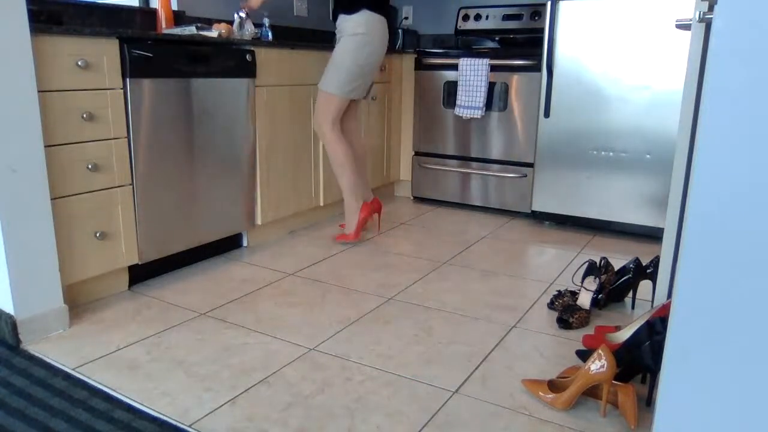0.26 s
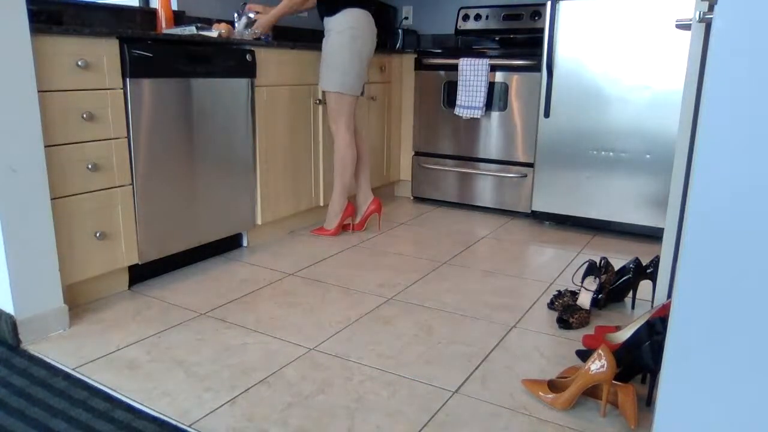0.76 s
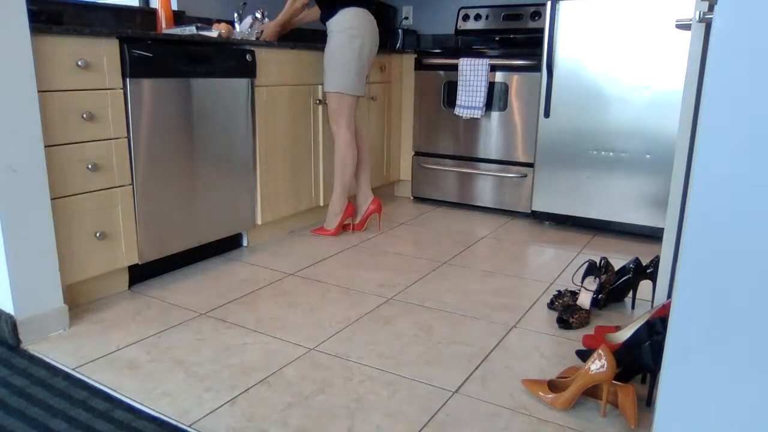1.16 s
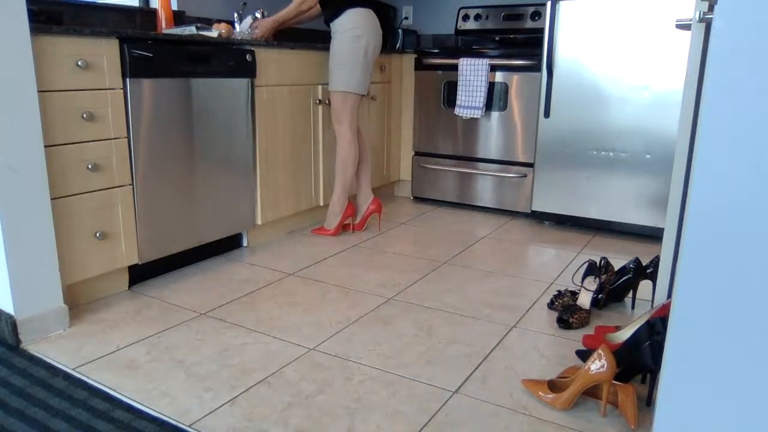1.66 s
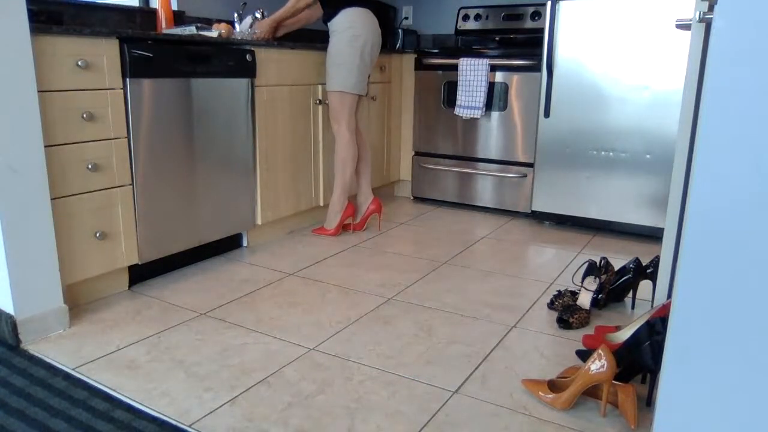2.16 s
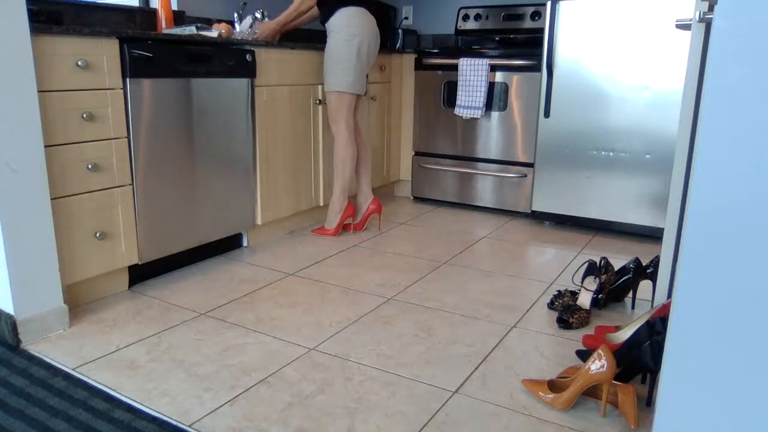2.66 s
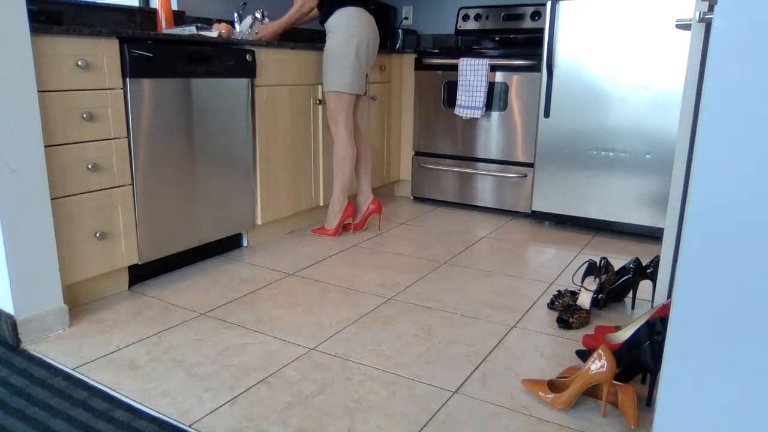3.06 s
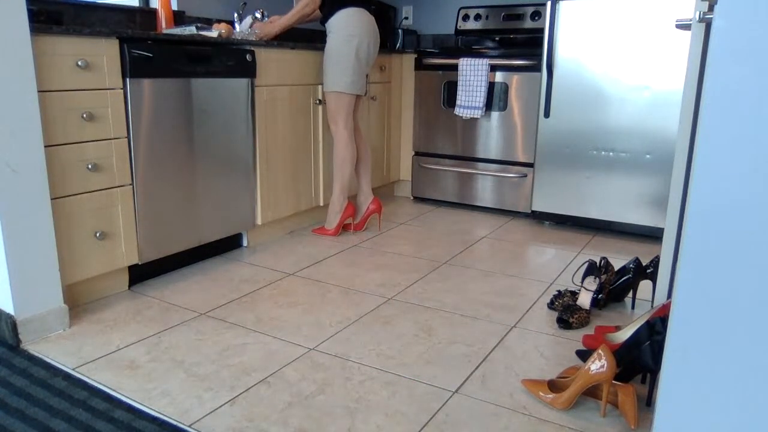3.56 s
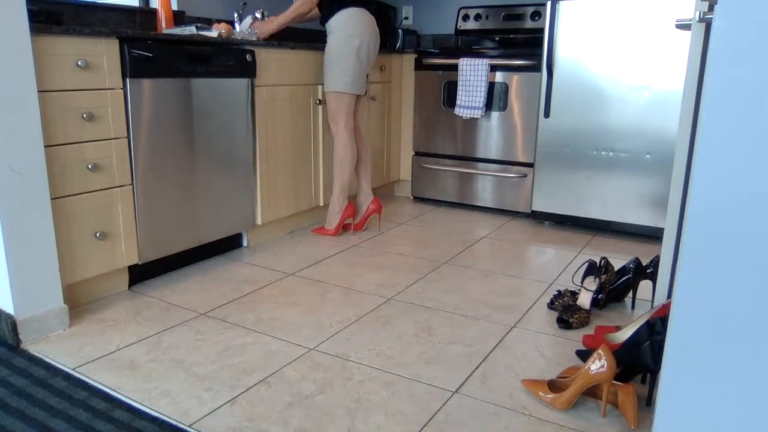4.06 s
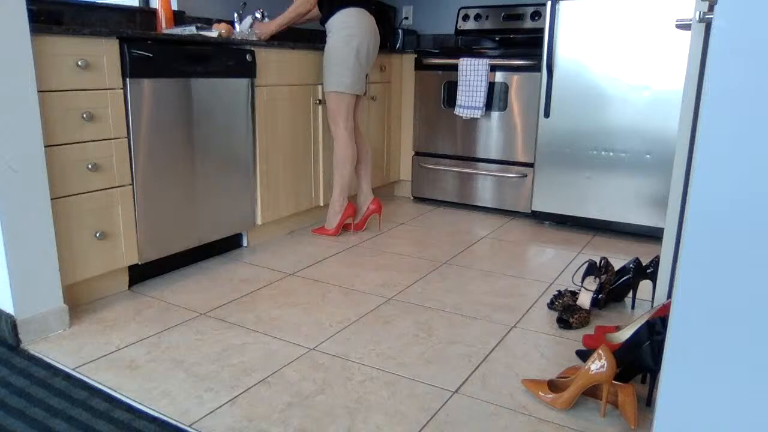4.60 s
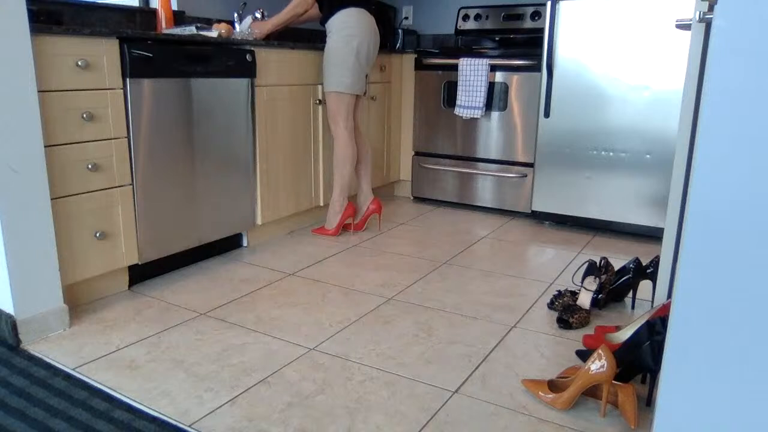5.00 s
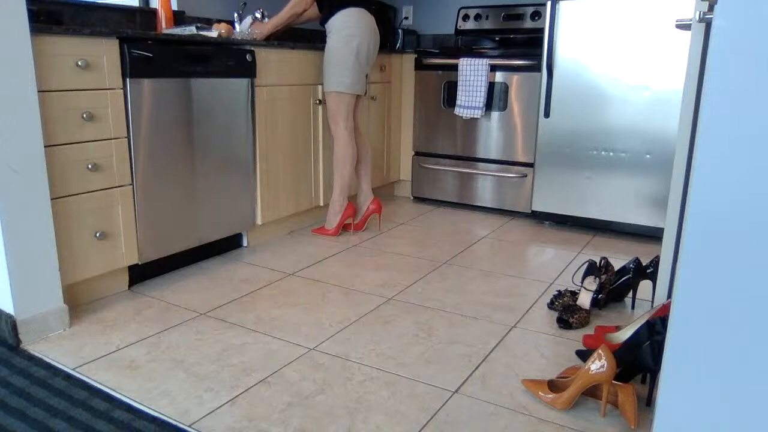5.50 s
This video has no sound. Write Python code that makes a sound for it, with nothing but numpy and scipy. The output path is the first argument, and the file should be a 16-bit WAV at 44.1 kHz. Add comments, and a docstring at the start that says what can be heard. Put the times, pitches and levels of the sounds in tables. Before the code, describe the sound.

High heels knock on a tile floor, then tap water splashes in short, uneven bursts over hands in a steel kitchen sink.

```python
"""A heel knocks, the room booms, and water splashes in short bursts: hands work under a tap that
runs into a steel kitchen sink across the room. Splashes are ringing bubbles, each burst with its
echo off the tiles; lower rings follow one heel knock and plop in the basin. The smallest drops
make a bright spray, dense ones a brief hiss. The bursts stop short. Between them the stream drums,
gurgles and hisses, faint and patchy. A noise suppressor dims the lulls."""
import sys
import numpy as np
from scipy import signal
from scipy.fft import rfft, irfft, next_fast_len
from scipy.io import wavfile
from scipy.ndimage import uniform_filter1d

SR = 44100
rng = np.random.default_rng(int(sys.argv[2]) if len(sys.argv) > 2 else 0)


def generate_wav(signal):
    """Clip the signal to [-1, 1] and save it as 16-bit WAV at the path in sys.argv[1]."""
    frames = np.transpose(np.atleast_2d(signal))
    scaled = np.clip(frames, -1, 1) * 32767
    pcm = np.round(scaled).astype(np.int16)
    wavfile.write(sys.argv[1], SR, pcm)


N = 253134
T = np.arange(SR // 3) / SR  # time within one event, s


def amp(db):
    return 10 ** (np.asarray(db) / 20)


def unit_rms(x):
    return x / np.sqrt(np.mean(x ** 2) + 1e-20)


def curve(points, hz):
    """Linear gain from (f/Hz, level/dB) points on a log frequency axis."""
    f, db = np.transpose(points)
    return amp(np.interp(np.log(hz + 1), np.log(f + 1), db))


def bell(hz, centre_hz, octaves):
    return np.exp(-.5 * (np.log2((hz + 1) / centre_hz) / np.clip(octaves, .015, 1.5)) ** 2)


def filtered(x, response):
    size = next_fast_len(len(x) + 4096)
    return irfft(rfft(x, size) * response(np.fft.rfftfreq(size, 1 / SR)), size)[:len(x)]


def envelope(t, t60_s, length_s, rise_s, fall_db_per_s=400):
    """Rise and decay, with an extra fall after length_s."""
    fall_db = fall_db_per_s * np.clip(t - length_s, 0, None)
    return (1 - np.exp(-t / rise_s)) * amp(-60 * t / t60_s - fall_db)


def add(track, start_s, sound):
    track[round(start_s * SR):][:len(sound)] += sound


def droplets(size, per_s, cycles, drops_db):
    """Noise strewn with tiny ringing drops, each drawn out by the tiled walls."""
    when, pitch, rank = rng.random((3, size * per_s // SR + 1, 1))
    steps = np.arange(SR // 60)
    age_cycles = steps / SR * 1800 * 9 ** pitch
    shape = (1 - np.exp(-(age_cycles / 3) ** 2)) * np.exp(-age_cycles / cycles)
    strength = amp(3.5 * np.log(1 / rank).clip(0, 3.5)) * 3 ** pitch
    rings = strength * shape * np.sin(2 * np.pi * age_cycles)
    drops = np.bincount(((when * size).astype(int) + steps).ravel(), rings.ravel())[:size]
    walls = rng.standard_normal(SR // 8) * amp(-60 * T[:SR // 8] / .11)
    blurred = signal.fftconvolve(drops, walls)[:size]
    return rng.standard_normal(size) + amp(drops_db) * unit_rms(blurred)


def ringing_bursts(bursts, count, cycles, glide, t60_lengths, echo_db, skirt_db):
    """Each burst is a slap, a few short rising rings, and the room's echo of their pitches."""
    out = np.zeros(N + SR)
    for start_s, db, hz, length_s, octaves in bursts:
        when, weakness = rng.random((2, count, 1))
        when[0] = 0  # one ring opens the burst
        pitch_hz = hz * 2 ** (octaves * rng.standard_normal((count, 1)))
        strength = amp(-9 * weakness)
        age_cycles = np.clip(T[:SR // 8] - length_s * when ** 2, 0, None) * pitch_hz
        shape = (1 - np.exp(-(age_cycles / 2) ** 2)) * np.exp(-age_cycles / cycles)
        phase = 2 * np.pi * age_cycles * (1 + glide * age_cycles)
        chirps = strength * amp(-6.9 * when) * shape * np.sin(phase)
        colour = lambda f: ((strength * bell(f, pitch_hz, 0.066)).sum(axis=0)
                            + 1.8 * bell(f, hz, octaves) + amp(skirt_db) * bell(f, hz, 5.6 * octaves))
        spatter = unit_rms(filtered(droplets(len(T), per_s=600, cycles=7, drops_db=-3), colour))
        slap = spatter * envelope(T, 0.0069, length_s, rise_s=0.0007)
        swell_s = 0.014 * np.exp(-0.07 * db) * length_s  # weak bursts swell more slowly
        echo = spatter * envelope(T, t60_lengths * length_s, length_s, swell_s)
        add(out, start_s, amp(1.99 * db + 11) * slap)  # only strong bursts slap hard
        add(out, start_s, amp(db - 6) * chirps.sum(axis=0))
        add(out, start_s, amp(db + echo_db) * echo)
    return out[:N]


# Small-bubble bursts: t/s, level/dB, f/Hz, length/s, spread/oct
SPLASH_BURSTS = [(.962, -32.5, 5100, 0.068, 0.21), (.9974, -43, 5470, 0.25, 0.18),
                 (1.1157, -27.5, 4860, 0.06, .27), (1.3127, -24, 4850, 0.078, .13),
                 (1.356, -32, 5100, 0.034, .2), (1.438, -33.5, 5400, .07, 0.34),
                 (1.516, -35, 5900, 0.044, 0.099), (1.6204, -30, 5730, 0.066, 0.059),
                 (1.689, -26, 4000, 0.15, .25), (1.7255, -22.5, 5000, 0.053, 0.27),
                 (1.809, -20, 5000, 0.13, 0.39), (1.877, -17, 5790, 0.035, 0.37),
                 (2.0165, -28.5, 5880, 0.045, .15), (2.0394, -30.5, 4340, .055, .12),
                 (2.0926, -32.5, 3570, .11, 0.25), (2.18, -29.5, 6630, 0.047, 0.23),
                 (2.2534, -26, 6550, 0.013, .16), (2.305, -26, 4760, .02, 0.31),
                 (2.3233, -13, 4110, 0.078, .18), (2.4129, -13, 4560, 0.08, 0.32),
                 (2.4705, -14.5, 6000, 0.045, .13), (2.528, -24.5, 5720, 0.078, 0.091),
                 (2.585, -20, 4800, 0.057, .22), (2.659, -30, 5740, 0.034, .17),
                 (2.7362, -21.5, 3500, 0.083, .24), (2.889, -33, 4240, 0.055, 0.15),
                 (3.019, -24, 4680, 0.062, .4), (3.071, -15, 5380, 0.043, .23),
                 (3.107, -29.5, 4460, 0.081, .1), (3.1683, -21, 6190, 0.05, 0.1),
                 (3.24, -27.5, 5030, 0.019, .08), (3.361, -25.5, 6660, 0.069, 0.18),
                 (3.388, -20, 5580, .06, 0.21), (3.514, -23.5, 5020, 0.042, 0.35),
                 (3.581, -25.5, 4690, 0.077, .13), (3.668, -28, 4560, 0.07, 0.27),
                 (4.2, -33.5, 4740, 0.12, 0.57), (4.302, -29.5, 5300, 0.039, 0.24),
                 (4.3505, -26.5, 5730, 0.11, 0.16), (4.416, -39, 5900, 0.031, 0.099),
                 (4.6144, -42, 5800, 0.036, 0.23), (4.775, -25.5, 5080, .06, 0.23),
                 (4.8326, -22.5, 4630, 0.059, 0.13), (5.015, -31, 3670, 0.077, 0.14),
                 (5.0446, -25.5, 6600, 0.063, .15), (5.1722, -25.5, 4700, 0.073, 0.066),
                 (5.23, -22.5, 3910, 0.053, 0.078), (5.321, -32.5, 4330, 0.058, 0.086),
                 (5.3796, -35, 4100, 0.045, .12), (5.464, -25, 5420, 0.11, .25)]


def splashes():
    """Hands break the stream into bubbles: a narrow spread of sizes plinks, a wide one splats."""
    return ringing_bursts(SPLASH_BURSTS, count=12, cycles=9.8, glide=0.0016,
                          t60_lengths=5.02, echo_db=-12.5, skirt_db=-10)


# Short low-pitched rings: t/s, level/dB, f/Hz, length/s, spread/oct
LOW_RINGS = [(.549, -34.5, 1050, 0.029, .08), (.562, -36.5, 665, 0.052, 0.052), (.79, -56, 1820, .1, 0.047),
             (1.629, -48, 752, 0.048, 0.039), (1.734, -42.5, 759, 0.076, .3), (1.855, -50, 697, 0.039, .1),
             (1.955, -41, 1980, 0.064, 0.148), (2.102, -46.5, 2360, 0.1, 0.16),
             (2.322, -43, 1520, 0.14, 0.195), (2.41, -38.5, 1633, 0.067, 0.14),
             (2.593, -28.5, 2007, 0.069, 0.076), (3.163, -39.5, 1225, 0.049, 0.097),
             (3.208, -45.5, 2340, 0.054, 0.066), (3.673, -41.5, 2570, 0.061, 0.09),
             (3.748, -44.5, 2390, 0.098, 0.37), (4.6, -55, 2420, 0.1, .08), (4.61, -57, 642, .08, 0.092),
             (5.085, -52, 1112, .08, 0.37), (5.56, -43.5, 2340, 0.09, 0.19), (5.634, -50, 875, 0.05, .4)]


def low_rings():
    """The first two ring on after a heel knock; the rest are plops in the basin."""
    return ringing_bursts(LOW_RINGS, count=5, cycles=24, glide=0.00062,
                          t60_lengths=4.08, echo_db=2, skirt_db=1)


# Hiss spectrum: f/Hz, level/dB
HISS_SPECTRUM = [(4120, -25.5), (7000, -8), (7870, -11), (9190, -4.5), (15100, -6), (16000, -18.5),
                 (16300, -78)]
# Fine spray: t/s, level/dB, emphasis f/Hz, length/s
SPRAY_BURSTS = [(0.358, -28, 11200, 0.11), (0.5567, -23, 9300, .17), (0.971, -35.5, 10800, 0.097),
                (0.988, -29.5, 9550, 0.053), (1.104, -46, 9600, 0.1), (1.206, -40, 11700, 0.066),
                (1.276, -35, 9300, .06), (1.3684, -31.5, 10800, 0.11), (1.5, -33.5, 10700, .06),
                (1.565, -34, 10600, .045), (1.621, -36.5, 11300, 0.03), (1.701, -27, 8100, 0.019),
                (1.796, -36, 8900, 0.066), (1.934, -54, 10100, 0.046), (1.999, -32.5, 11100, 0.068),
                (2.077, -43, 14200, 0.1), (2.183, -34, 8900, 0.056), (2.256, -30.5, 11300, 0.044),
                (2.32, -21.5, 12700, 0.041), (2.406, -20.5, 8800, 0.069), (2.46, -20, 9400, .06),
                (2.624, -57, 8700, 0.019), (2.688, -62, 11400, 0.047), (2.7413, -21, 11700, 0.032),
                (2.797, -40, 13500, 0.024), (2.8802, -24.5, 10450, 0.049), (3.01, -34.5, 13700, .057),
                (3.159, -24, 10500, 0.027), (3.23, -33.5, 13100, 0.03), (3.35, -51, 12400, .065),
                (3.378, -32, 11100, 0.049), (3.5, -43, 9650, 0.048), (3.663, -25, 11300, 0.043),
                (3.726, -36.5, 11200, 0.051), (3.954, -44.5, 9600, 0.027), (4.087, -38, 11500, 0.029),
                (4.2, -40, 13900, 0.049), (4.598, -40, 15000, 0.043), (4.698, -35.5, 10600, 0.026),
                (4.778, -41, 11700, 0.04), (4.8262, -24.5, 12000, 0.04), (5.036, -33, 9600, 0.045),
                (5.105, -36.5, 9100, 0.026), (5.172, -31.5, 13500, 0.053), (5.378, -35.5, 13500, .025),
                (5.489, -28, 9100, .03), (5.508, -27.5, 9800, .13), (5.638, -33, 13400, 0.027)]


def spray():
    """The smallest drops: a bright, grainy hiss that stops short."""
    out = np.zeros(N + SR)
    t = T[:SR // 4]
    for start_s, db, hz, length_s in SPRAY_BURSTS:
        # single drops sink into the hiss of a long burst
        drops = droplets(len(t), per_s=300, cycles=8, drops_db=6 - 100 * length_s)
        hiss = filtered(drops, lambda f: curve(HISS_SPECTRUM, f) * (1 + 0.68 * bell(f, hz, 0.075)))
        shape = envelope(t, 8.35 * length_s, length_s, rise_s=0.068 * length_s, fall_db_per_s=691)
        add(out, start_s, amp(db - 10.5) * unit_rms(hiss) * shape)
    return out[:N]


# Rushing-water spectrum: f/Hz, level/dB
RUSH_SPECTRUM = [(1060, -61), (1800, -41), (2200, -8.5), (2830, -8), (3740, 1), (4390, 0.5), (5760, 1.5),
                 (9500, -11.5), (12400, -42), (20900, -120)]
# Brief hissing bursts of water: t/s, level/dB, emphasis f/Hz, width/oct, rise/s, length/s
HISS_BURSTS = [(0.353, -38.5, 4000, 0.97, 0.016, 0.085), (0.558, -36.5, 5370, 1, 0.0082, 0.16),
               (5.171, -31.5, 6040, 0.34, 0.002, 0.035), (5.491, -25.5, 6600, 0.28, 0.077, 0.11)]


def hiss_bursts():
    """Too many drops to tell apart; the burst at 5.17 s is a splash's wide hiss."""
    out = np.zeros(N + SR)
    for start_s, db, hz, octaves, rise_s, length_s in HISS_BURSTS:
        drops = droplets(len(T), per_s=1500, cycles=6, drops_db=-12)
        hiss = filtered(drops, lambda f: curve(RUSH_SPECTRUM, f) * (0.061 + bell(f, hz, octaves)))
        add(out, start_s, amp(db) * unit_rms(hiss) * envelope(T, 2.3, length_s, rise_s))
    return out[:N]


# Clack spectrum: f/Hz, level/dB
CLACK_SPECTRUM = [(88, -46), (150, -16.5), (201, -1), (269, -1), (506, -7.5), (1060, -15), (1930, -17),
                  (3010, -30.5), (5030, -36), (9000, -43), (11700, -43.5), (19800, -120)]
# Floor and room modes: f/Hz, level/dB, t60/s
ROOM_MODES = [(76, -13.5, 1), (100, -27, 0.29), (136.3, 9, 0.42), (163, -3, 0.68), (245.2, -6.5, 0.93),
              (335.4, -2, 0.25), (441.4, -1, 0.12)]
# Heel and toe on tiles: t/s, clack level/dB, clack f/Hz, width/oct, boom level/dB, length/s
HEEL_KNOCKS = [(.005, -28, 1020, 0.39, -86, 0.049), (0.309, -39.5, 500, 0.31, -25, 0.14),
               (.348, -26.5, 1100, 2.7, -24, 0.098), (0.527, -24, 847, 0.68, -64, 0.014),
               (.55, -36, 313, 0.067, -48.5, 0.053), (3.019, -59, 292, 0.21, -44.5, 0.086),
               (3.641, -53.5, 297, 0.61, -48, 0.048), (5.375, -54, 300, 1.2, -45, 0.032)]


def heel():
    """The heel's clack rings round the room; its weight sets the low modes swelling."""
    out = np.zeros(N + SR)
    for start_s, clack_db, clack_hz, octaves, boom_db, length_s in HEEL_KNOCKS:
        colour = lambda f: curve(CLACK_SPECTRUM, f) * (0.078 + bell(f, clack_hz, octaves))
        noise = unit_rms(filtered(rng.standard_normal(len(T)), colour))
        clack = noise * envelope(T, 4.08 * length_s, length_s, rise_s=0.0067)
        strike = np.sin(2 * np.pi * clack_hz * T) * envelope(T, 0.023, length_s, rise_s=0.00033)
        modes = sum(amp(db + rng.normal(0, 1) - 60 * T / t60_s) * np.sin(2 * np.pi * hz * T)
                    for hz, db, t60_s in ROOM_MODES)
        swell_s = 20 / clack_hz  # a dull, soft step loads the floor slowly
        add(out, start_s, amp(clack_db) * (amp(0.5) * strike + clack))
        add(out, start_s, amp(boom_db) * modes * envelope(T, 9.4, length_s, swell_s))
    return out[:N]


def patchy(source, response, depth_db, bins, frames):
    """The source with random gain patches in frequency and time, filtered, at rms 1."""
    spectrum = signal.stft(source, nperseg=256)[2]
    patches = uniform_filter1d(rng.standard_normal(spectrum.shape), size=bins, axis=0)
    patches = unit_rms(uniform_filter1d(patches, size=frames, axis=1))
    mottled = signal.istft(spectrum * amp(depth_db * patches), nperseg=256)[1][:N]
    return unit_rms(filtered(mottled, response))


# Basin drumming spectrum: f/Hz, level/dB
DRUM_SPECTRUM = [(18, -51), (30, -27.5), (130, 0.5), (240, -1.5), (269, -14), (313, -1.5), (387, -18.5),
                 (529, -17), (600, -27.5), (780, -46), (1320, -120)]
# Gurgle spectrum: f/Hz, level/dB
GURGLE_SPECTRUM = [(210, -8), (350, -4), (599, -17.5), (1040, -10), (1240, -11.5), (1460, -6.5),
                   (2790, -18), (3200, -20), (4160, -21.5), (7040, -120)]
# Steel resonances: f/Hz, width/oct, boost/dB
BASIN_RINGS = [(665.4, 0.075, 11.5), (1073.4, 0.013, 8), (1337, 0.014, 4.5), (1710, 0.06, 0.5)]
# Heard level of the background water, nearly muted at the start: t/s, drum level/dB, trickle level/dB
STREAM_LEVELS = [(0.0, -52.5, -74), (0.37, -84.5, -86.5), (0.48, -57.5, -46.5), (0.56, -46.5, -58),
                 (0.78, -66, -51), (1.02, -61, -78.5), (1.17, -62, -64), (1.8, -59.5, -45),
                 (2.25, -63.5, -50), (2.48, -62.5, -36.5), (2.89, -63.5, -50.5), (3.61, -65.5, -49),
                 (3.85, -69.5, -52.5), (4.62, -64, -65), (5.4, -64.5, -52.5), (5.74, -60, -55)]


def stream():
    """The falling water drums on the basin, gurgles, rushes and hisses."""
    times_s, *levels = np.transpose(STREAM_LEVELS)
    drum_db, trickle_db = [np.interp(np.arange(N) / SR, times_s, db) for db in levels]
    gurgle_db = trickle_db + 0.66 * (drum_db - trickle_db) - 2.5
    steel = lambda f: amp(sum(db * bell(f, hz, octaves) for hz, octaves, db in BASIN_RINGS))
    trickle = droplets(N, per_s=300, cycles=7, drops_db=-5)
    drum = patchy(rng.standard_normal(N), lambda f: curve(DRUM_SPECTRUM, f),
                  depth_db=3.5, bins=1, frames=20)
    gurgle = patchy(rng.standard_normal(N), lambda f: curve(GURGLE_SPECTRUM, f) * steel(f),
                    depth_db=2.8, bins=1, frames=14)
    rush = patchy(trickle, lambda f: curve(RUSH_SPECTRUM, f), depth_db=3, bins=3, frames=12)
    hiss = patchy(trickle, lambda f: curve(HISS_SPECTRUM, f), depth_db=3, bins=8, frames=10)
    return (amp(drum_db) * drum + amp(gurgle_db) * gurgle
            + amp(trickle_db - 8.5) * rush + amp(trickle_db - 11.5) * hiss)


def scene():
    return (splashes() + low_rings() + stream() + hiss_bursts() + spray() + heel())[None]


def record(dry):
    """A noise suppressor favours lasting spectral peaks and dims the lulls; then a band limit."""
    noise_share, floor_db = 0.22, -2
    low_hz, top_hz = 45, 15900
    spectrum = signal.stft(dry[0], nperseg=512, noverlap=384)[2]
    lasting_power = np.abs(uniform_filter1d(np.abs(spectrum) ** 2, size=13, axis=1)) + 1e-20
    nearby_power = np.abs(uniform_filter1d(lasting_power, size=9, axis=0)) + 1e-20
    noise_power = noise_share * np.median(nearby_power, axis=1, keepdims=True)
    peak_gain = np.clip(lasting_power / nearby_power, .05, 4) ** .36
    lull_gain = np.clip(1 - noise_power / nearby_power, amp(2 * floor_db), 1) ** .5
    thinned = signal.istft(spectrum * peak_gain * lull_gain, nperseg=512, noverlap=384)[1][:N]
    return filtered(thinned, lambda hz: (hz < top_hz) / (1 + (low_hz / (hz + 1)) ** 3))[None]


dry = scene()
out = record(dry)
generate_wav(out)
```